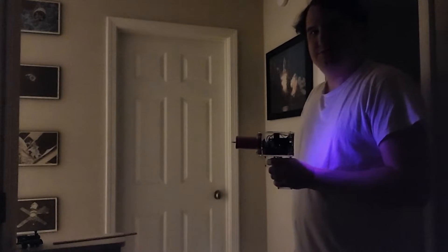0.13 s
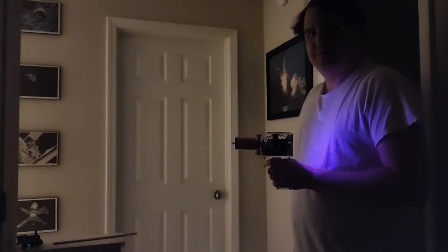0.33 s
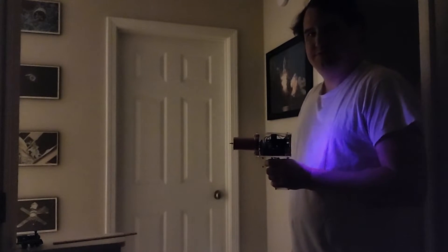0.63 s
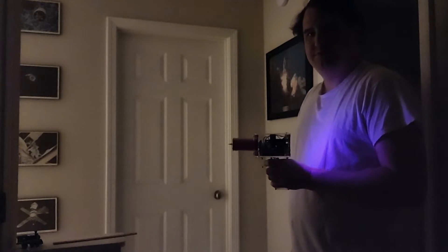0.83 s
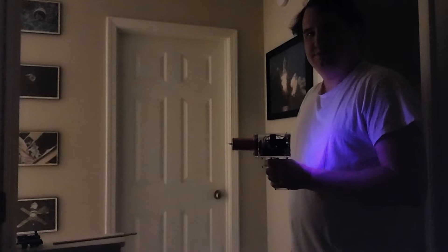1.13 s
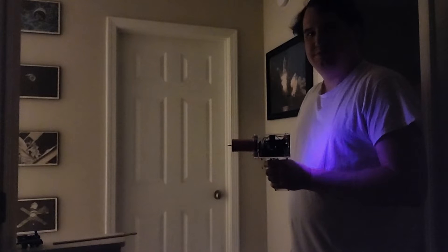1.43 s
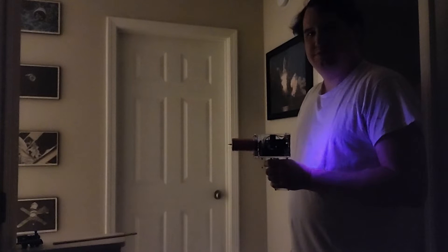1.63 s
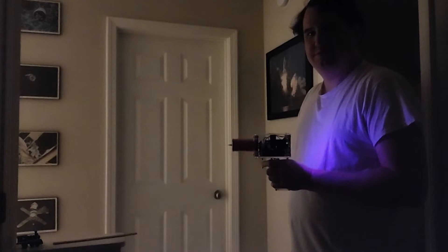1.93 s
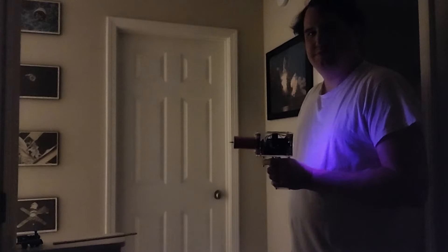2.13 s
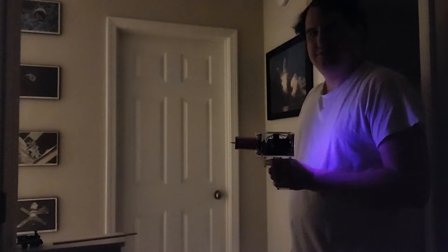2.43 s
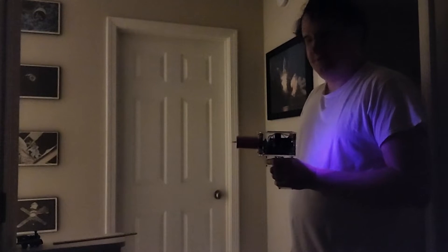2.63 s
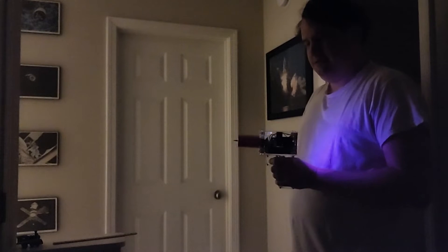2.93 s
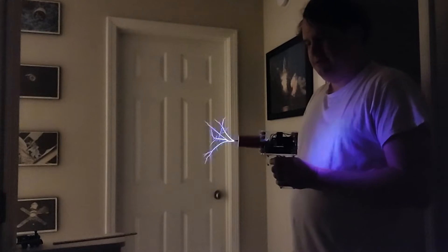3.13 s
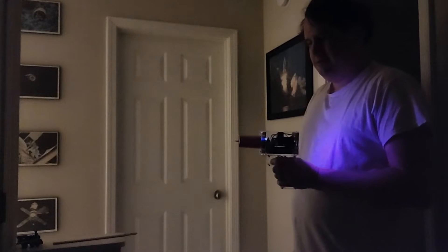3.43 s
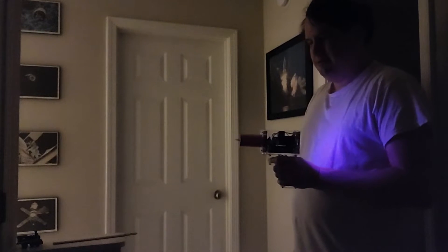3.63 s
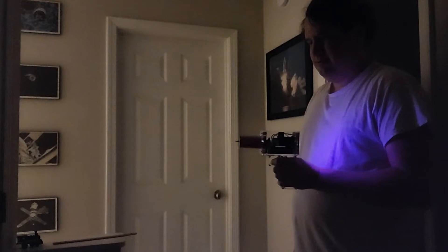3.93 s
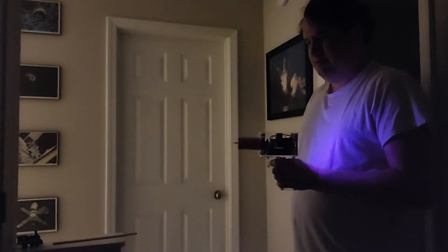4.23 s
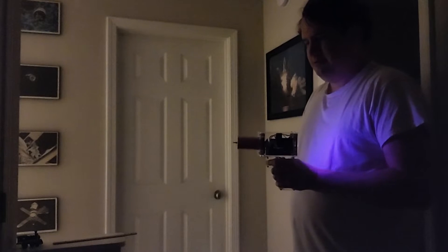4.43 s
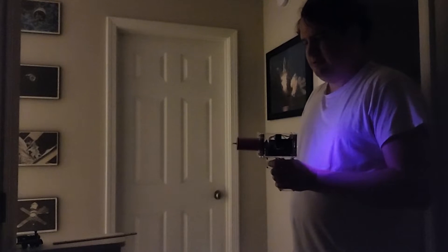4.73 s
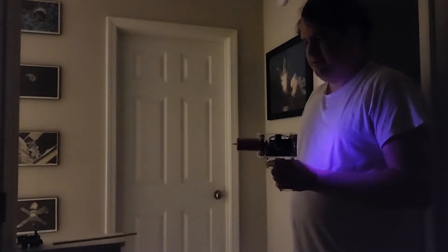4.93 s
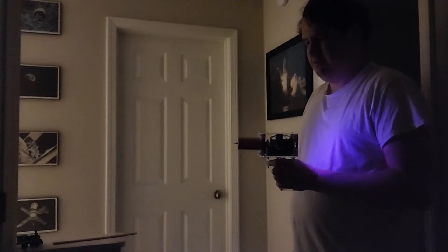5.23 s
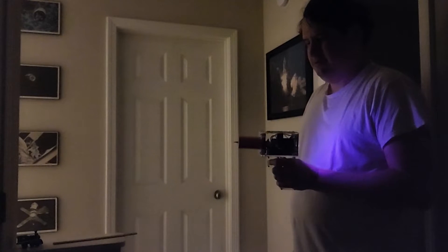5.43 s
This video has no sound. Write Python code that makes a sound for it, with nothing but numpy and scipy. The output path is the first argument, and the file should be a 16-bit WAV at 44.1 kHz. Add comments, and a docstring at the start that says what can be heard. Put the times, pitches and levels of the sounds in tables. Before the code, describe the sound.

Sharp, loud electric sparks snap one by one in uneven runs in a small furnished room, with brief echoes and a near-silent background.

```python
"""A handheld coil throws single branching sparks in short runs in a small furnished room.
Each spark is a low pressure pulse (one sine cycle) plus a crackle of shaped noise from its branches.
The near walls throw both back; then they ring out here and, fainter and longer, in the rooms beyond.
A low rumble and a faint hiss, both steady shaped noise, lie beneath, with one faint treble rustle."""
import sys
import numpy as np
from scipy import signal
from scipy.io import wavfile
from scipy.ndimage import uniform_filter1d

SR = 44100
rng = np.random.default_rng(int(sys.argv[2]) if len(sys.argv) > 2 else 0)


def output_pcm(signal):
    """Save a mono or channel-first signal as 16-bit PCM at the path in sys.argv[1].

    Samples are clipped to [-1, 1] before scaling.
    """
    pcm = np.clip(np.atleast_2d(signal).T, -1, 1) * 32767
    wavfile.write(sys.argv[1], SR, np.round(pcm).astype(np.int16))


N = 245637  # length of the scene in samples


def amp(db):
    """Turns decibels into a gain."""
    return 10 ** (np.asarray(db) / 20)


def evened(x):
    """Scales a sound to an rms level of 1."""
    return x / np.sqrt(np.mean(x ** 2) + 1e-20)


def read(points, hz):
    """Reads a table of (pitch, value) at any pitch, in straight lines over log pitch."""
    f, value = np.transpose(points)
    return np.interp(np.log(hz + 1), np.log(f + 1), value)


def add(mix, s, sound):
    """Mixes a two-channel sound in at s seconds, cut off where the mix ends."""
    part = mix[:, round(s * SR):][:, :sound.shape[1]]
    part += sound[:, :part.shape[1]]


def steady(colour):
    """A tone colour that does not change in time."""
    return lambda hz, t: amp(read(colour, hz))


def noise(gain, alike, length, size=256, lumpy_db=0):
    """Two channels of random short-time spectra shaped by gain(hz, t), in uneven lumps if asked."""
    hop = size // 4
    frames = 4 * length // size + 5
    hz = np.fft.rfftfreq(size, 1 / SR)[:, None]
    a, b, c, d, lumps = rng.standard_normal((frames, len(hz), 5)).T
    # blur the lumps over neighbouring pitches and moments
    lumps = uniform_filter1d(lumps, size=4, axis=0)
    lumps = evened(uniform_filter1d(lumps, size=4, axis=1))
    # the right channel shares part of the left one, the rest is its own
    same = np.clip(read(alike, hz), -1, 1)
    left, own = a + 1j * b, c + 1j * d
    right = same * left + np.sqrt(1 - same ** 2) * own
    spectra = np.array([left, right])
    spectra *= gain(hz, np.arange(frames) * size / 4 / SR) * amp(lumpy_db * lumps)
    return signal.istft(spectra, nperseg=size, noverlap=size - hop)[1][:, :length]


# How alike left and right are in the drone and the hiss: (pitch_hz, likeness 0 to 1)
BACKGROUND_ALIKE = [(60, .89), (130, .7), (290, .2), (640, 0)]
# Colour of the hiss: (pitch_hz, relative level_db per Hz)
HISS_COLOUR = [(120, -30), (250, 0), (650, -9), (1400, -12), (6600, -21), (9500, -26), (16000, -20)]
HISS_DB = -83.5


def hiss():
    """Faint steady hiss of room and microphones: noise shaped by its colour."""
    return amp(HISS_DB) * evened(noise(steady(HISS_COLOUR), BACKGROUND_ALIKE, N, size=1024))


# Colour of the house's drone: (pitch_hz, relative level_db per Hz)
RUMBLE_COLOUR = [(15, -45), (30, -24), (50, -10), (68, 0), (82, -5), (100, -23), (121, -14), (145, -25),
                 (165, -19), (190, -30), (300, -45), (500, -100)]
RUMBLE_DB = -68.5


def rumble():
    """The house's low drone: long noise frames resolve its narrow bands of pitch."""
    return amp(RUMBLE_DB) * evened(noise(steady(RUMBLE_COLOUR), BACKGROUND_ALIKE, N, size=4096))


# Colour of a rustle: (pitch_hz, relative level_db per Hz)
RUSTLE_COLOUR = [(1500, -23), (2500, 3), (5000, -1), (8500, -10), (12000, 0), (16000, -20)]


def rustle(length, db):
    """A short thin brush of treble noise that swells at once and dies away."""
    alike = [(2000, .3), (9000, .1)]  # (pitch_hz, left-right likeness)
    brush = noise(steady(RUSTLE_COLOUR), alike, round(length * SR), lumpy_db=3.)
    u = np.linspace(0, 5, brush.shape[1])  # loudest at u = 1
    return amp(db) * evened(brush) * u * np.exp(1 - u)


# How fast this room dies away: (pitch_hz, time_s to fall by 60 dB)
NEAR_T60 = [(100, 0.18), (260, 0.27), (700, 0.2), (1840, 0.15), (4850, 0.15), (12800, 0.076)]
# How fast the rooms beyond die away: (pitch_hz, time_s to fall by 60 dB)
FAR_T60 = [(200, 1), (530, 0.64), (1390, 0.71), (3680, 0.69), (9700, 0.41)]
# Starting level of the rooms beyond against this room: (pitch_hz, level_db)
FAR_SHARE = [(100, -17), (400, -13.5), (1000, -18.5), (2000, -24), (4000, -26), (12000, -24)]
# How alike left and right are in the tails: (pitch_hz, likeness 0 to 1)
TAIL_ALIKE = [(60, 1), (300, 0.99), (700, 0.045), (2000, 0.071)]


def tail(colour, rise_ms, size=256):
    """Diffuse sound: a quick decay in this room over a slow one from the rooms beyond."""
    def gain(hz, t):
        near = amp(-60 * t / read(NEAR_T60, hz))
        far = amp(read(FAR_SHARE, hz) - 60 * t / read(FAR_T60, hz))
        return amp(read(colour, hz)) * np.hypot(near, far)
    x = noise(gain, TAIL_ALIKE, SR, size=size, lumpy_db=-1.0)
    rise = 1 - np.exp(-(np.arange(SR) / SR * 1e3 / rise_ms) ** 2)
    first_50_ms = x[:, :SR // 20]
    return rise * x / np.sqrt(np.mean(first_50_ms ** 2))


# Direct path, then the strongest reflections: (left_delay_ms, right_delay_ms, left_db, right_db)
WALLS = [(0.05, 0.07, -4, -4), (0.93, 1.11, -11, -11), (2.74, 2.27, -10, -8.5), (3.36, 2.95, -13, -13),
         (4.15, 4.1, -13, -10), (5.87, 4.85, -18, -11), (7.01, 5.42, -19, -11), (7.85, 7.48, -13, -13),
         (8.48, 8.34, -15, -11), (9.93, 9.93, -10, -17), (10.7, 10.75, -11, -16), (11.18, 11.93, -10, -8),
         (18.3, 18.28, -16, -15), (21.93, 25.06, -17, -16), (25.15, 25.5, -20, -14)]
# weaker reflections off furniture, scattered at random between those
STRAY_PER_MS, STRAY_DB, STRAY_FADE_DB_PER_MS, STRAY_SPREAD_DB = .5, -21, .3, 2.
STRAY_LOW_HZ = 600  # small things let longer waves pass
FLUTTER_MS = 10.03  # round trip between two facing walls
FLUTTER_DB, FLUTTER_LOSS_DB = -20, 5  # second return, and loss at each further one


def paths():
    """Echoes as single taps: direct path, near walls, their flutter and furniture, per microphone."""
    left_ms, right_ms, left_db, right_db = np.transpose(WALLS)
    taps = np.zeros((2, SR // 20))
    ms = np.arange(SR // 20) * 1e3 / SR
    chance, spread = rng.random(taps.shape), rng.standard_normal(taps.shape)
    hit = (chance < STRAY_PER_MS * 1e3 / SR) * (ms > 2)
    taps += hit * amp(STRAY_DB - STRAY_FADE_DB_PER_MS * ms + STRAY_SPREAD_DB * spread)
    taps = signal.sosfilt(signal.butter(1, STRAY_LOW_HZ, "high", fs=SR, output="sos"), taps)
    np.add.at(taps[0], np.round(left_ms * SR / 1e3).astype(int), amp(left_db))
    np.add.at(taps[1], np.round(right_ms * SR / 1e3).astype(int), amp(right_db))
    turns = np.arange(2, 5)
    returns = np.round(turns * FLUTTER_MS * SR / 1e3).astype(int)
    taps[:, returns] += amp(FLUTTER_DB - FLUTTER_LOSS_DB * (turns - 2))
    return taps


# Standing waves of the room: (pitch_hz, relative level_db, time_s to fall by 60 dB)
ROOM_MODES = [(135, -10, .12), (163, -9, .11), (195, -7, .16), (255, -17, .1), (287, -13, .25),
              (343, -11, .12), (368, -6, .14), (394, -7, .13), (438, -9, .1), (530, -8, .15),
              (592, -11, .2)]


def standing_waves():
    """Decaying sines at the room's own pitches, every second one upside down."""
    t = np.arange(SR) / SR
    modes = 0
    for k, (hz, db, t60) in enumerate(ROOM_MODES):
        modes = modes + (-1) ** k * amp(db - 60 * t / t60) * np.sin(2 * np.pi * hz * t)
    modes *= 1 - np.exp(-t / 0.0039)  # standing waves take a few crossings to build
    return modes * amp([[-1.5], [0]])  # left a little softer than right


# Colour of the pulse as the room returns it: (pitch_hz, relative level_db per Hz)
BOOM_COLOUR = [(70, -45), (170, -28), (300, -19), (450, -13), (620, -11), (800, -9), (1100, -6), (1500, -6),
               (2200, -13), (3200, -30), (5500, -100)]
BOOM_DB = -24.5  # diffuse return, against the pulse
PULSE_MS = .86  # one push and pull of the heated air


def pulse(taps):
    """The push and pull of the whole channel; the room answers it alike every time."""
    u = np.arange(0, PULSE_MS, 1e3 / SR) / PULSE_MS
    early = signal.fftconvolve(taps, np.sin(2 * np.pi * u)[None])
    boom = tail(BOOM_COLOUR, rise_ms=14.0, size=512)
    sound = amp(BOOM_DB) * boom + amp(-20) * standing_waves()
    add(sound, 0, early)
    return sound


# Basic colour of the branches' crackle: (pitch_hz, relative level_db per Hz)
CRACKLE_COLOUR = [(880, -27), (1500, -8.5), (1810, -20.5), (2000, -15.5), (2560, -11.5), (3120, -9),
                  (3480, -10.5), (6430, -12), (9950, -24.5), (16000, -24.5)]


def branches(sizzle_db, ripple_db):
    """The colour of one spark: snaps from unlike distances add and cancel in uneven peaks."""
    hz = np.geomspace(800, 17000, 60)
    ripple = ripple_db * rng.standard_normal(len(hz))
    sizzle = sizzle_db * np.clip(np.log2(hz / 6000), 0, 1)  # from 6 kHz, full at 12 kHz
    return np.transpose([hz, read(CRACKLE_COLOUR, hz) + ripple + sizzle])


BRANCH_MS = .26  # time to the densest branch snaps
SCATTER_DB_PER_MS = 3.5  # rough walls break the crackle up: its mirror images fade with delay


def crackle(taps, lean_db, sizzle_db):
    """Branches differ each time: new snaps, new directions, a new diffuse tail."""
    colour = branches(sizzle_db, ripple_db=3.)
    alike = [(2000, 1.0), (9000, 0.16)]  # (pitch_hz, left-right likeness)
    snaps = evened(noise(steady(colour), alike, 256))
    u = np.arange(256) * 1e3 / SR / BRANCH_MS
    snaps = snaps * u * np.exp(1 - u) * amp([[lean_db / 2], [-lean_db / 2]])
    # the room gathers the spark from all sides, so its peaks are evened out
    gathered = branches(sizzle_db, ripple_db=1.)
    sound = amp(-15.0) * tail(gathered, rise_ms=2.2, size=128)
    ms = np.arange(taps.shape[1]) * 1e3 / SR
    scattered = taps * amp(-SCATTER_DB_PER_MS * ms)
    add(sound, 0, amp(2) * signal.fftconvolve(scattered, snaps, axes=1))
    return sound


# Sparks: (start_s, crackle_db, left_over_right_db of the crackle, extra treble sizzle_db)
SPARKS = [(.0056, -11.5, 10.5, 4.5), (0.4062, -10, 2, 4), (0.6457, -10, 0.5, 1.5),
          (0.9218, -10.5, 4.5, 2.5), (1.1195, -10, 9, 6), (1.314, -10, -2.5, 2), (1.4790, -9.5, -3.5, 5),
          (1.6466, -10, -1, 5.5), (1.7965, -10.5, -15, 5), (2.9442, -10, 2, 1.5), (3.1898, -9, 2.5, 1.5),
          (3.3902, -10.5, 2.5, 6), (3.7454, -9.5, -9.5, 5), (3.9457, -10.5, 0, 3.5), (4.1739, -11, 12, 4.5),
          (4.7208, -11.5, 4.5, 3)]
# Faint treble rustles: (start_s, length_s, level_db before the swell)
RUSTLES = [(2.806, .06, -77)]
PULSE_DB = -1.85  # every discharge pushes the air about equally hard


def scene():
    """Sparks and a rustle in the room, over the rumble and hiss."""
    taps = paths()
    sparks = np.zeros((2, N))
    push = amp(PULSE_DB) * pulse(taps)
    for s, crackle_db, lean_db, sizzle_db in SPARKS:
        add(sparks, s, push + amp(crackle_db) * crackle(taps, lean_db, sizzle_db))
    for s, length, db in RUSTLES:
        add(sparks, s, rustle(length, db))
    # the sparks carry little sound below about 85 Hz
    bass_cut = signal.butter(2, 85, "high", fs=SR, output="sos")
    return signal.sosfilt(bass_cut, sparks) + rumble() + hiss()


CEILING = .93  # level the peaks bend towards, full scale = 1
EDGE_HZ = 15900  # upper band limit


def record(dry):
    """The highest peaks are rounded off near full scale; then the band limit."""
    held = dry / (1 + abs(dry / CEILING) ** 6) ** (1 / 6)
    band_limit = signal.firwin(255, EDGE_HZ, window=("kaiser", 9), fs=SR)
    return signal.oaconvolve(held, band_limit[None], "same")


dry = scene()
out = record(dry)
output_pcm(out)
```